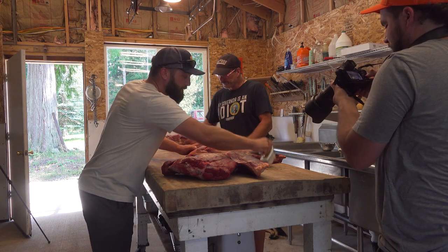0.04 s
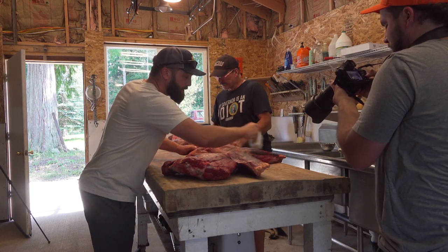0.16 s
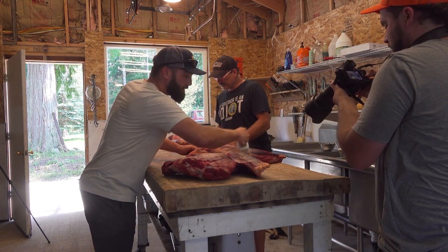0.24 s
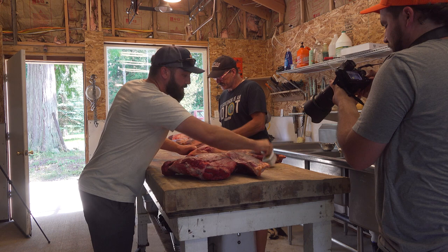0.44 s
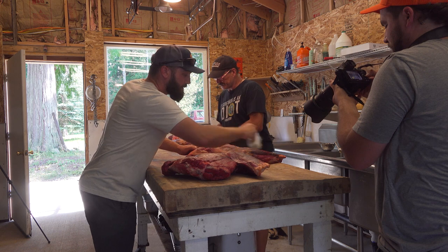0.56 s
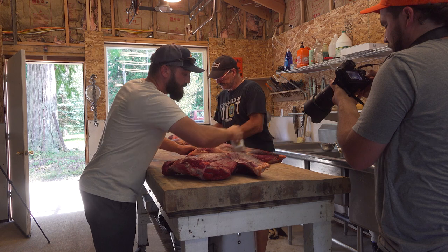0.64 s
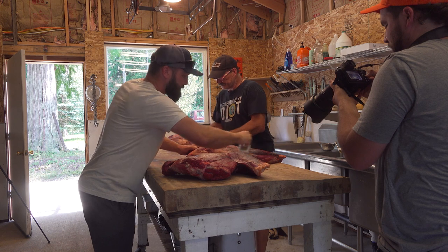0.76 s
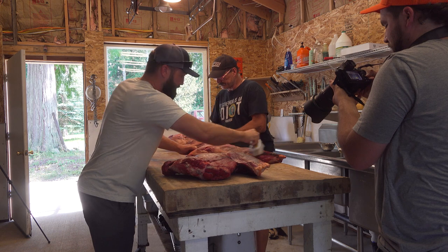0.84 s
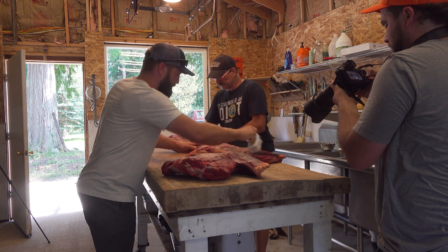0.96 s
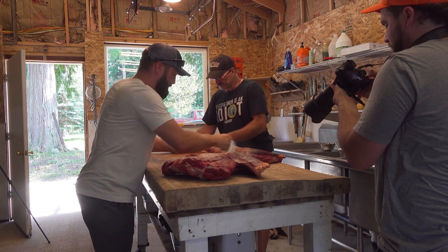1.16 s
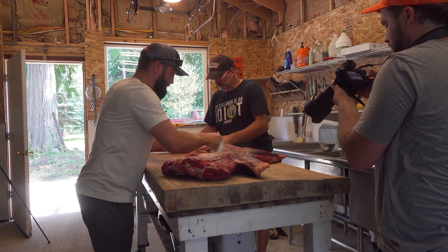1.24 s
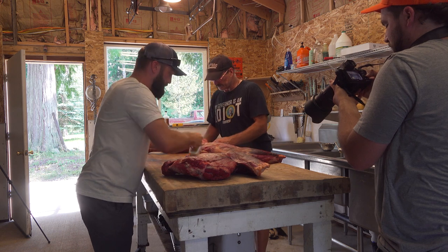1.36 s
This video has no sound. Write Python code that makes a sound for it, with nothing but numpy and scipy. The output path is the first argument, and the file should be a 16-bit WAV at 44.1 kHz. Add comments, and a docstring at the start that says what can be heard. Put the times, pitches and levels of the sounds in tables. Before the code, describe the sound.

Quick brush strokes rasp and hiss faintly across meat on a butcher's block. A loud hollow wooden knock rings out near the start, with softer bumps near the end, over a low cooling machine hum in a small, slightly echoing room.

```python
"""Quick scratchy brush strokes sweep over raw meat on a butcher's block in a small wooden shop.
The bristles catch and let go in dense clicks: a rasp, with a fine hiss from their tips.
A cooling machine hums and moves air throughout. One loud hollow knock and a few softer bumps
set wood ringing and echo through the room."""
import sys
import numpy as np
from scipy import signal
from scipy.fft import rfft, irfft, next_fast_len
from scipy.io import wavfile
from scipy.ndimage import uniform_filter1d

SR = 44100
rng = np.random.default_rng(int(sys.argv[2]) if len(sys.argv) > 2 else 0)


def generate_wav(sig):
    """Save sig (samples, or channels by samples) to the path in sys.argv[1] as 16-bit PCM at SR."""
    pcm = np.round(np.clip(np.atleast_2d(sig).T, -1, 1) * 32767).astype(np.int16)
    wavfile.write(sys.argv[1], SR, pcm)


N = 61739


def undb(db):
    """Decibels to gain."""
    return 10 ** (np.asarray(db) / 20)


def unit_rms(x):
    """Scale to rms 1."""
    return x / np.sqrt(np.mean(x ** 2))


def over_hz(points, hz):
    """Interpolate (f/Hz, value) points on a log-frequency axis."""
    points_hz, values = np.array(points, float).T
    return np.interp(np.log(np.maximum(hz, 1)), np.log(points_hz), values)


def colour(x, spectrum):
    """Filter by a spectrum; result at rms 1."""
    size = next_fast_len(2 * N)
    gain = undb(over_hz(spectrum, np.fft.rfftfreq(size, 1 / SR)))
    return unit_rms(irfft(rfft(x, size) * gain, size)[:N])


def impulse(spectrum):
    """Minimum-phase response of unit energy with the given spectrum."""
    size = 2 * next_fast_len(N)
    gain = undb(over_hz(spectrum, np.fft.rfftfreq(size, 1 / SR)))
    cepstrum = irfft(np.log(gain))
    cepstrum[1:size // 2] *= 2
    cepstrum[size // 2 + 1:] = 0
    return unit_rms(irfft(np.exp(rfft(cepstrum)))[:N]) / np.sqrt(N)


def convolve(x, response):
    """Pass a sound through a response."""
    return signal.fftconvolve(x, response)[:N]


def delay(x, delay_s):
    """Shift later, keeping N samples."""
    return np.concatenate([np.zeros(max(int(delay_s * SR), 0)), x])[:N]


def drift(rate_hz):
    """Smoothed random steps at rms 1."""
    width = int(SR / rate_hz)
    steps = np.repeat(rng.standard_normal(N // width + 2), width)
    return unit_rms(uniform_filter1d(uniform_filter1d(steps, width), width)[:N])


# shop reverberation: f/Hz, t60/s
ROOM_DECAY = [(120, 0.51), (400, 0.45), (1100, 0.44), (3000, 0.53), (8000, 0.46), (15000, 0.25)]


def shop_echo(t, build_s=.012):
    """Diffuse room response of unit energy; each band dies at its own rate."""
    noise = rfft(rng.standard_normal(2 ** 16))
    hz = np.fft.rfftfreq(2 ** 16, 1 / SR)
    edges_hz = np.concatenate([[0], np.geomspace(180, SR / 2, 15)])
    onset = 1 - np.exp(-(t / build_s) ** 2)
    out = 0
    for lo, hi in zip(edges_hz, edges_hz[1:]):
        band = irfft(noise * (hz >= lo) * (hz < hi))[:N]
        fade = undb(-60 * t / over_hz(ROOM_DECAY, (lo + hi) / 2))
        out = out + unit_rms(band * fade * onset) * np.sqrt(hi - lo)
    return unit_rms(out) / np.sqrt(N)


def bristle_flicks(flicks_per_s=13000, scatter_db=3):
    """Bristles catch and let go: dense clicks of uneven size."""
    hits = rng.random(N) < flicks_per_s / SR
    return hits * np.sign(rng.standard_normal(N)) * undb(scatter_db * rng.standard_normal(N))


# strokes: start/s, rise/s, hold/s, release/s, rasp/dB, hiss/dB
BRUSH_STROKES = [(-.03, .06, .035, .055, -53.5, -61.5), (.102, .013, .008, .02, -63, -69),
                 (.318, .022, .015, .015, -64, -74), (.372, .045, .04, .04, -54.5, -60),
                 (.465, .022, .013, .03, -57, -74), (.735, .105, .08, .03, -62.5, -71.5),
                 (.872, .028, .026, .02, -61, -64), (1.15, .011, .006, .018, -59.5, -71),
                 (1.179, .014, .014, .018, -61.5, -70), (1.312, .033, .035, .06, -61, -71.5)]
# bristles on meat: f/Hz, relative level/dB
RASP_SPECTRUM = [(500, 0), (1200, -0.5), (1800, -4), (2400, -3.5), (2900, 2), (3600, 0.5), (4300, -3),
                 (5300, -7), (6800, -17.5), (10000, -16), (16000, -32.5)]
# bristle tips: f/Hz, relative level/dB
HISS_SPECTRUM = [(2000, -25), (4000, -5), (5500, -1.5), (7500, -6.5), (10000, -3.5), (13000, -0.5),
                 (14800, -6.5), (16000, -3)]


def brush(t, drag_db=.8, echo_db=-7):
    """Each stroke swells, drags unevenly and lifts off, with a rasp and a fine hiss."""
    rasp_gain = hiss_gain = 0
    for start_s, rise_s, hold_s, release_s, rasp_db, hiss_db in BRUSH_STROKES:
        pressure = np.interp(t, start_s + np.cumsum([0, rise_s, hold_s, release_s]), [0, 1, 1, 0])
        rasp_gain = rasp_gain + pressure * undb(rasp_db)
        hiss_gain = hiss_gain + pressure * undb(hiss_db)
    rasp = rasp_gain * colour(bristle_flicks(), RASP_SPECTRUM)
    hiss = hiss_gain * colour(bristle_flicks(), HISS_SPECTRUM)
    direct = (rasp + hiss) * undb(drag_db * drift(rate_hz=120))
    echo = undb(echo_db) * convolve(direct, shop_echo(t))
    return (direct + echo) / np.hypot(1, undb(echo_db))


# machine hum: f/Hz, base level/dB
HUM_LINES = [(28.5, -60.5), (58.8, -63.5), (118.4, -68.5), (232, -63), (937, -71)]
# swell of the lowest line: t/s, gain/dB
HUM_SWELL = [(0, -15), (.3, -4), (.55, 6.5), (.8, 4), (1.0, 0), (1.4, -6.5)]
# moving air: f/Hz, relative level/dB
AIR_SPECTRUM = [(20, -4), (45, -30), (85, -5.5), (130, -6), (240, -2), (400, -6), (750, -6), (1000, -6.5),
                (1300, -10), (1800, -21), (3000, -21), (5000, -31), (8000, -42.5), (15500, -53)]


def cooling_machine(t, air_db=-59, waver_db=.8, waver_hz=1.5):
    """Moving air and hum; the lowest line swells and fades, the others waver."""
    out = undb(air_db) * colour(rng.standard_normal(N), AIR_SPECTRUM)
    for line, (hz, db) in enumerate(HUM_LINES):
        if line == 0:
            db = db + np.interp(t, *np.array(HUM_SWELL).T)
        else:
            db = db + waver_db * drift(rate_hz=7.3)
            hz = hz + waver_hz * drift(rate_hz=14.64)
        cycles = np.cumsum(hz * np.ones(N)) / SR + rng.random()
        out = out + np.sqrt(2) * undb(db) * np.sin(2 * np.pi * cycles)
    return out


# struck wood: f/Hz, relative level/dB, t60/s
WOOD_MODES = [(143.2, -18, 0.63), (373, 5, 0.15), (405, -10, 0.37), (517.6, -1.5, 0.17),
              (634.3, -11.5, 0.42), (799, -9.5, 0.32), (830, -5, 0.43), (866, -24, 0.11),
              (1058.7, -1, 0.38), (1112.6, 6.5, 0.092), (1108, -2, 0.31), (1200, -0.5, .28),
              (1230.5, -6.5, 0.3), (1322, -13.5, 0.39), (1898, -17, 0.31), (1996, -9, 0.064)]


def wood_ring(t, gain_db=-23.5, build_s=.004):
    """Modes of the struck wood build quickly and decay at their own rates."""
    modes = sum(undb(db - 60 * t / t60_s) * np.sin(2 * np.pi * (hz * t + rng.random()))
                for hz, db, t60_s in WOOD_MODES)
    return modes * undb(gain_db) * (1 - np.exp(-t / build_s))


# blows: t/s, gain/dB, low-pass/Hz, high-pass/Hz, ring gain/dB, note/Hz, note gain/dB, echo gain/dB
BLOWS = [(0.2055, -13.5, 936, 251, -10, 443, -1, 3.5), (0.3084, -1, 4060, 113.3, 3, 452.4, 2, 2.5),
         (1.035, -41, 530, 337, 12, 412, 6, 4.5), (1.207, -34, 500, 324, -20, 397, 1, 13.5),
         (1.2384, -19, 880, 276, -16, 518.5, -1, 4)]
# body of a knock: f/Hz, relative level/dB
THUD_SPECTRUM = [(60, -33), (120, -11.5), (220, -11.5), (310, -5.5), (390, -5), (480, 2), (560, -9),
                 (760, -5), (930, -9), (1130, -2), (1350, -10.5), (1700, -18.5), (1920, -18), (2300, -26),
                 (2900, -37), (3400, -32.5), (5000, -56.5), (9000, -55), (16000, -75)]
# thud and first reflections: delay/s, linear gain
THUD_ARRIVALS = [(.002, 0.14), (.0053, 1.44), (0.0105, 0.91), (0.0214, .3)]
# first contact: f/Hz, relative level/dB
CRACK_SPECTRUM = [(500, -24), (1400, -2.5), (1950, -1.5), (2500, -8), (3400, -17.5), (5000, -24.5),
                  (8000, -38.5), (16000, -64)]


def knocks(t):
    """Blows on wood: a crack, a cushioned thud, a short hollow note, ringing modes and room echo."""
    thud_db, crack_db, note_base_db, echo_base_db = 6, -34, -13, 6.5
    contact_s, crack_decay_s, note_peak_s = .0003, .012, .0065
    body = impulse(THUD_SPECTRUM)
    force = t * np.exp(-4 * t / contact_s)
    arrivals = sum(gain * delay(body, delay_s) for delay_s, gain in THUD_ARRIVALS)
    thud = undb(thud_db) * convolve(arrivals, force / force.sum())
    ring = wood_ring(t)
    note_envelope = undb(note_base_db) * (t / note_peak_s * np.exp(1 - t / note_peak_s)) ** 2
    crack_envelope = undb(crack_db) * np.exp(-t / crack_decay_s)
    out = 0
    for start_s, gain_db, lowpass_hz, highpass_hz, ring_db, note_hz, note_db, echo_db in BLOWS:
        note = undb(note_db) * note_envelope * np.sin(2 * np.pi * note_hz * t)
        crack = crack_envelope * colour(rng.standard_normal(N), CRACK_SPECTRUM)
        echo = undb(echo_base_db + echo_db) * convolve(body, shop_echo(t))
        blow = crack + thud + note + undb(ring_db) * ring + echo
        for hz, kind in ((lowpass_hz, "low"), (highpass_hz, "high")):
            blow = signal.sosfilt(signal.butter(2, hz, kind, fs=SR, output="sos"), blow)
        out = out + undb(gain_db) * delay(blow, start_s)
    return out


def scene():
    """Brush, knocks and cooling machine in the shop, mono."""
    t = np.arange(N) / SR
    return (brush(t) + knocks(t) + cooling_machine(t))[None]


def record(dry):
    """A steep low-pass cuts the highest treble."""
    cutoff_hz = 15650
    return signal.sosfilt(signal.ellip(10, .2, 70, cutoff_hz, fs=SR, output="sos"), dry)


dry = scene()
out = record(dry)
generate_wav(out)
```